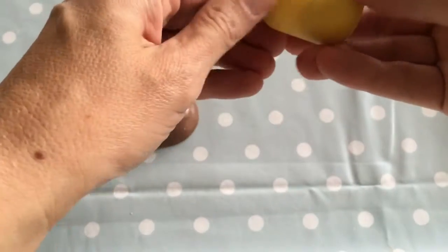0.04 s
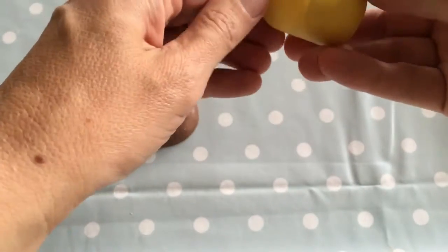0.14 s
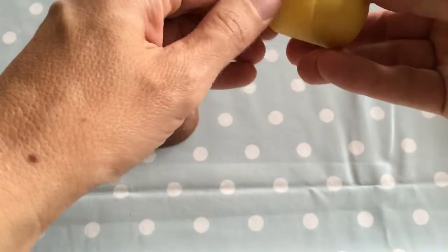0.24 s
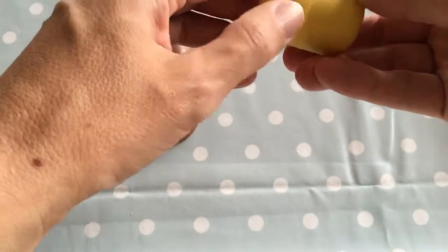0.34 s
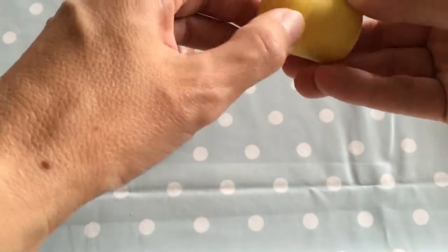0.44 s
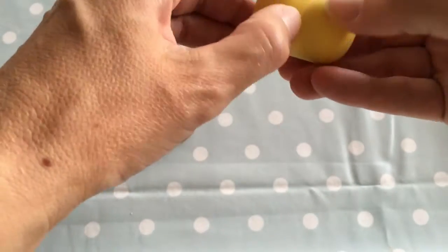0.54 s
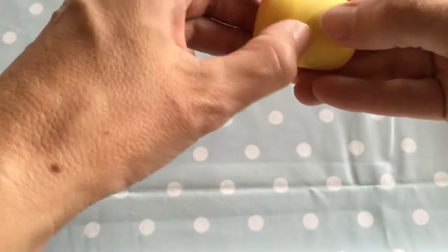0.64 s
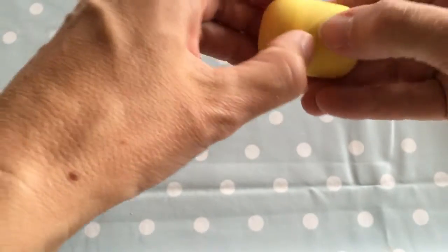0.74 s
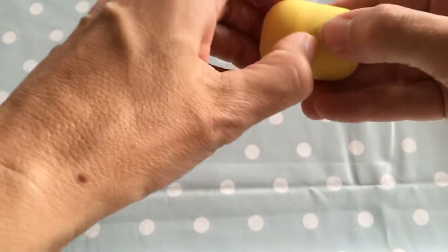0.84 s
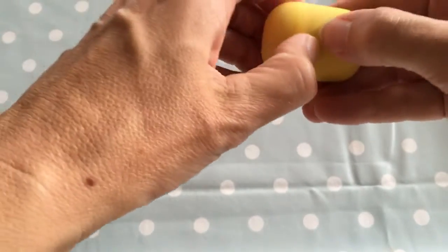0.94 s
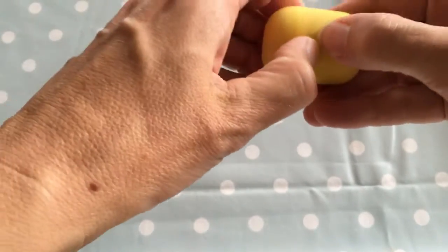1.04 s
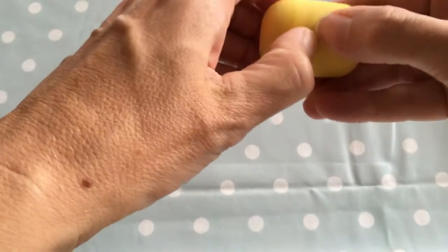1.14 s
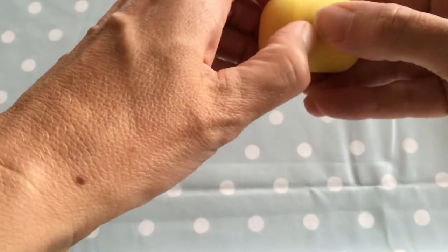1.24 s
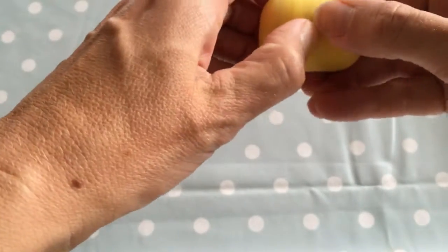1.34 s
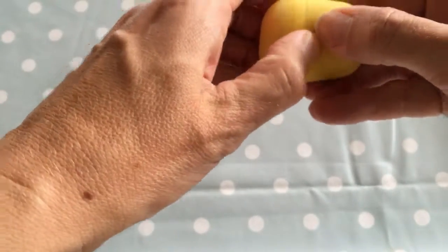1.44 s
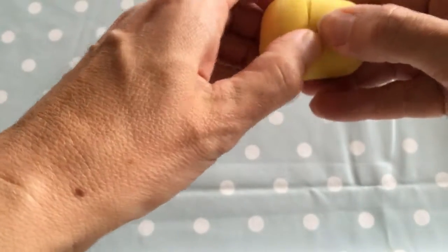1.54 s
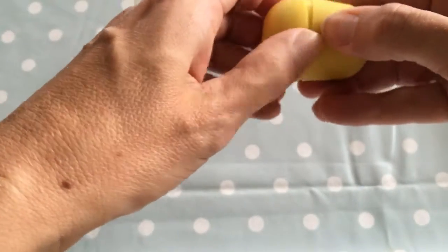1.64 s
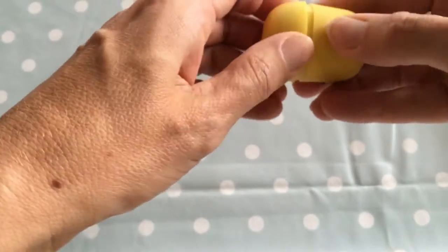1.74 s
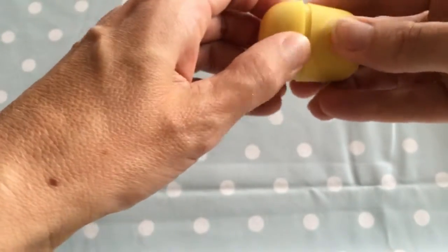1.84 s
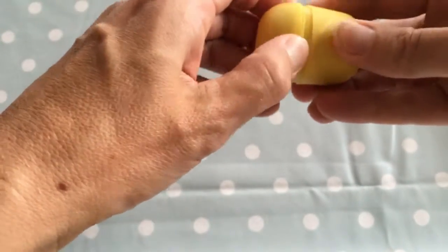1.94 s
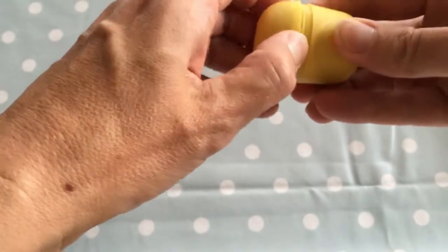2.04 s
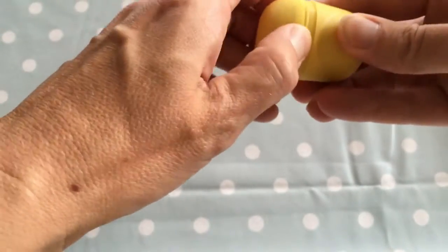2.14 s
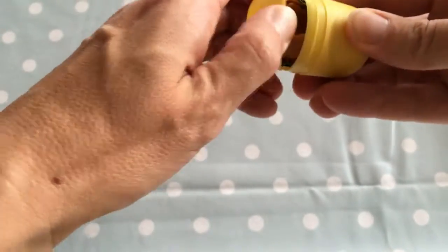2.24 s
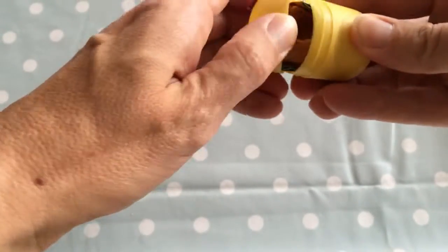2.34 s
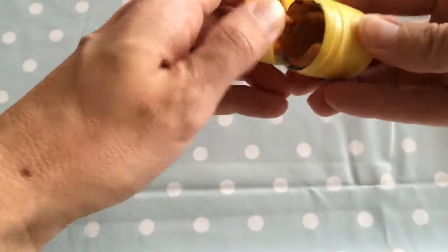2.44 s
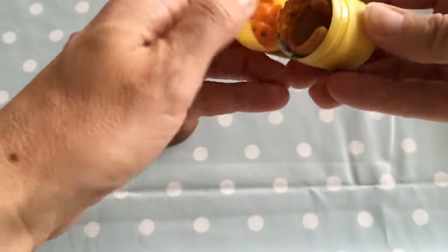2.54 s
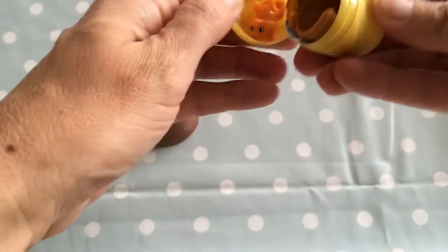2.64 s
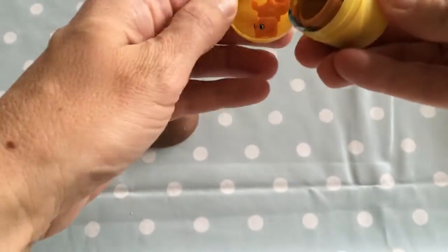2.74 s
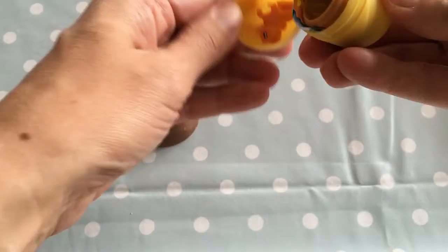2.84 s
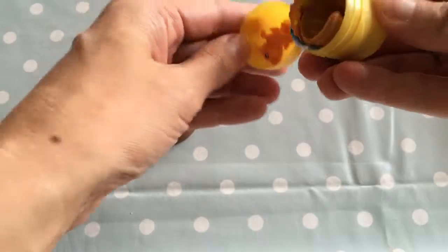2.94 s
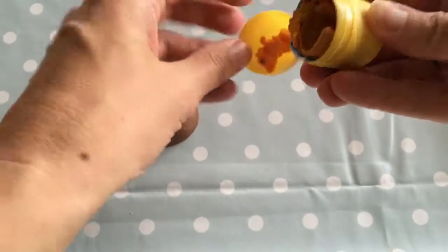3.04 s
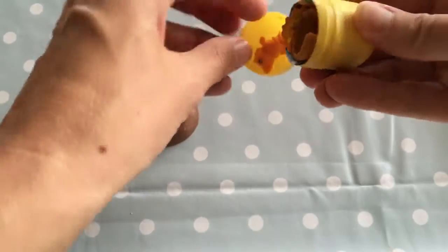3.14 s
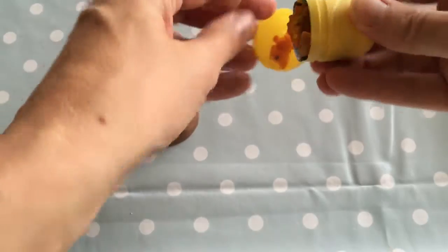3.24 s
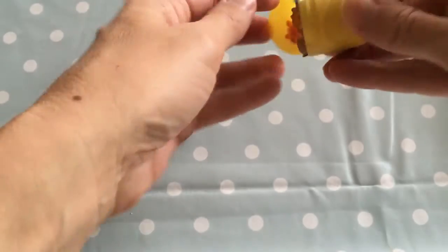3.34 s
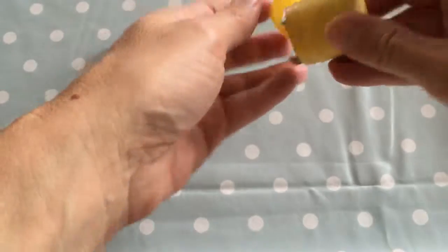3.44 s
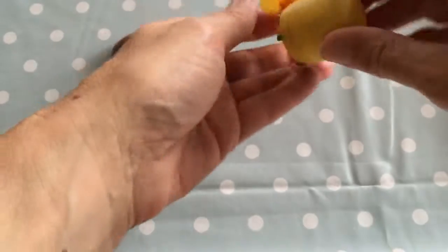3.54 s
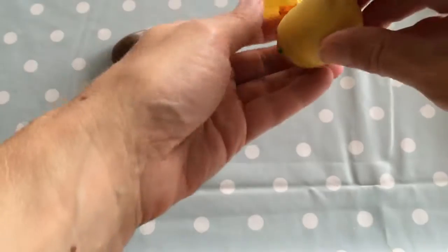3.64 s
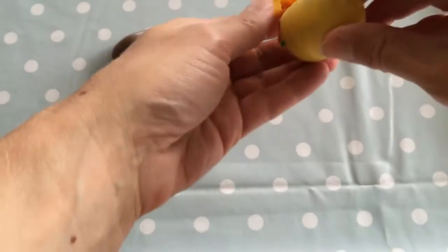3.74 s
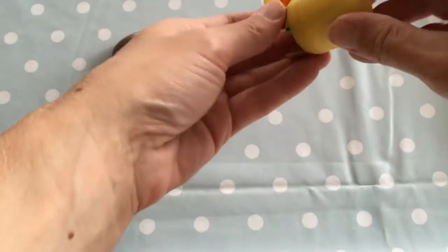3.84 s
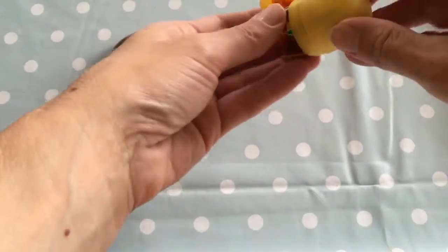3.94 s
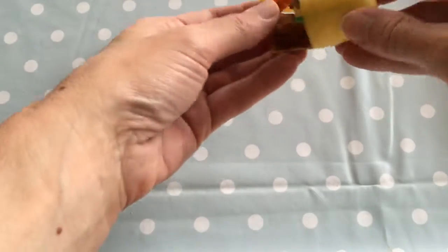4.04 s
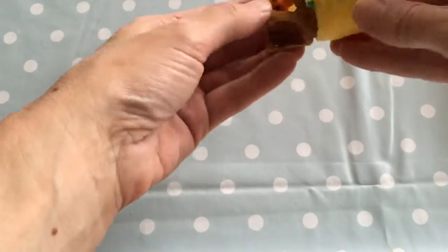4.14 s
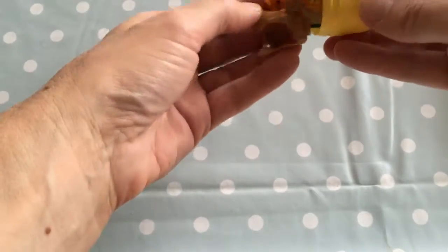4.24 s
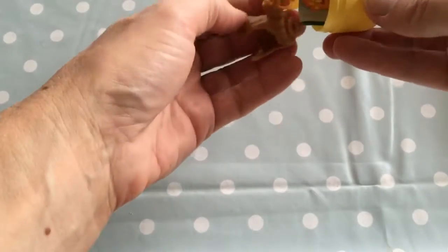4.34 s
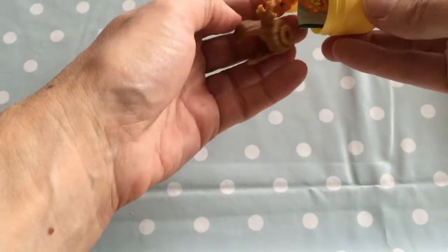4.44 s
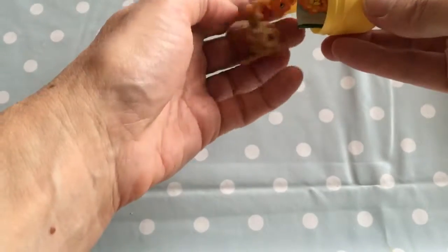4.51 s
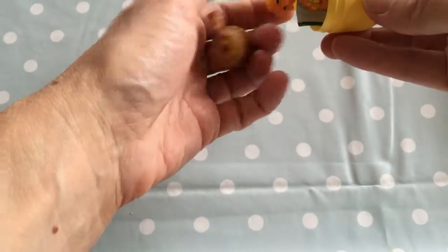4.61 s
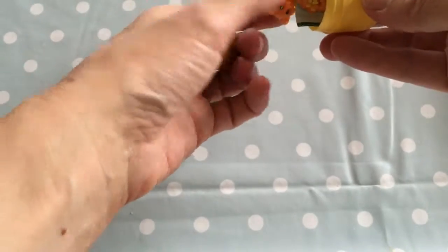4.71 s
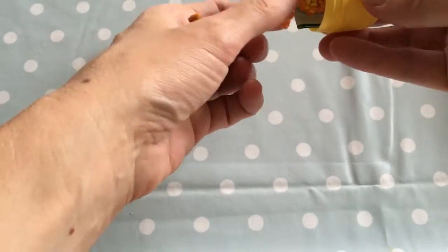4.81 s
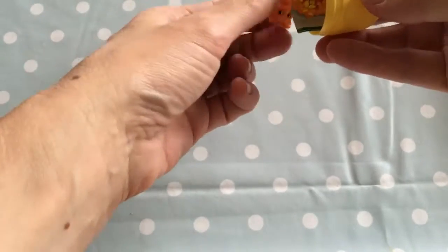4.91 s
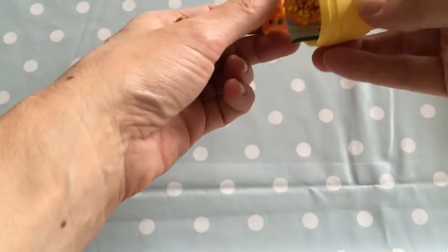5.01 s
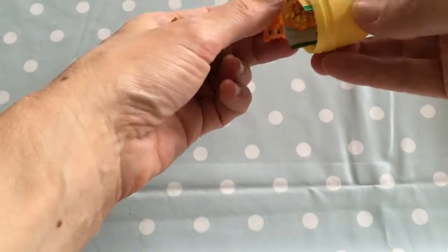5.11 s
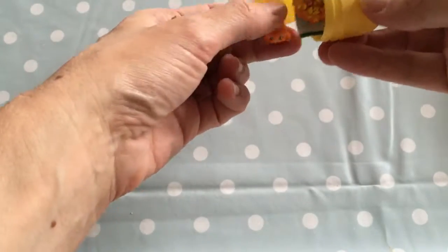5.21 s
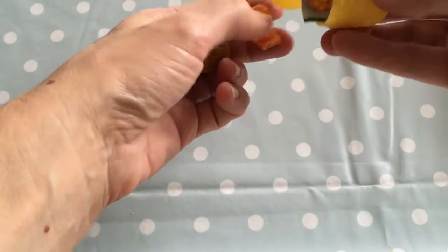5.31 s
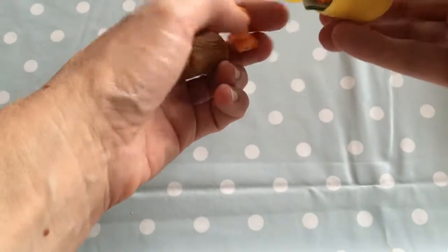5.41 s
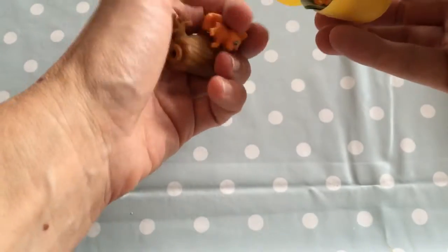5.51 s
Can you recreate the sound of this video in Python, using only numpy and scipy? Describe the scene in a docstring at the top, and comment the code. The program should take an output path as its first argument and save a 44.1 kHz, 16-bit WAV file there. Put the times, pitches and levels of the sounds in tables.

```python
"""Quiet humming room: hands squeeze a small plastic capsule until its seam snaps, pull it open, tip small parts in it.
Snaps and ticks are short forces ringing resonances of wall, cup air, shell and edge.
Slides are grainy friction noise on the same resonances; a noise tail adds the room.
The hum is coloured noise; the recorder's hiss comes up for a moment after each loud snap."""
import sys
import numpy as np
from scipy import signal
from scipy.fft import rfft, irfft
from scipy.io import wavfile
from scipy.ndimage import uniform_filter1d

SR = 44100
rng = np.random.default_rng(int(sys.argv[2]) if len(sys.argv) > 2 else 0)


def store_pcm(level_fs):
    """Save levels as 16-bit WAV."""
    pcm = np.round(np.clip(level_fs, -1, 1) * 32767).astype(np.int16)
    wavfile.write(sys.argv[1], SR, np.atleast_2d(pcm).T)


N = 245637

# Room hum, relative spectrum: (frequency [Hz], level [dB per Hz])
HUM_SPECTRUM = [(25, -24), (38, -9), (51, 6.5), (66, -10.5), (88, 0), (115, -10.5), (180, -9), (260, -14),
                (400, -24.5), (700, -26), (1500, -31.5), (2500, -62)]
HUM_RMS_DB = -63

# Recorder hiss, relative spectrum: (frequency [Hz], level [dB per Hz])
HISS_SPECTRUM = [(180, -29), (300, -0.5), (511, -11), (667, -12), (946, -9), (1010, -14.5), (2280, -11.5),
                 (9550, -17.5), (16000, -23)]
HISS_RMS_DB, HISS_HELD_DOWN_DB = -62.5, -11.5
RELEASE_PEAK_DB, RELEASE_HOLD_S = -15.5, 0.413

# Room tail bands: (centre [Hz], t60 [s], relative level [dB])
ROOM_BANDS = [(147, 1, -32.5), (324, .45, -24.5), (930, 0.81, -37.5), (1560, 0.38, -31.5),
              (2500, 0.42, -28), (4500, 0.27, -31.5), (6960, 0.14, -26), (12100, 0.12, -32)]
ECHO_DELAY_S, ECHO_RISE_S, TAIL_GAIN_DB = 0.0019, 0.0085, -17.5

# Dips of the microphone port: (centre [Hz], width [Hz], share removed [0-1])
PORT_DIPS = [(5000, 800, .3), (10500, 900, .45)]
CUTOFF_HZ = 16300

# Cup air pitch as the opening changes: rises, sinks a little, rises again: (time [s], pitch [Hz])
CUP_PITCH = [(2.3, 1400), (2.45, 1470), (2.55, 1720), (2.68, 1900), (3.6, 1830), (4.2, 1750), (5.3, 1950)]
OPEN_S = CUP_PITCH[0][0]

# Bending of the wall, first mode only while squeezed shut: (frequency [Hz], width [Hz], relative level [dB])
WALL_MODES = [(200, 130, -9.5), (370, 400, -8), (960, 1100, -5)]
# Shell modes: (frequency [Hz], width [Hz], relative level [dB])
SHELL_MODES = [(2600, 440, 2.5), (3190, 1700, -1), (3440, 560, 4), (4244, 810, -3.5), (5067, 820, -8.5)]
# Edge modes: (frequency [Hz], width [Hz], relative level [dB])
EDGE_MODES = [(6060, 2000, -5.5), (7420, 1200, -1.5), (8234, 1200, -2), (9565, 1800, -1),
              (11460, 2900, -0.2), (13600, 2600, -8.5)]

# Fingers and parts sliding, plastic level before its brightness split:
# (start [s], length [s], cup air level [dB], plastic level [dB], brightness [octaves above 1 kHz])
SLIDE_EVENTS = [(0.046, 0.1, -94.5, -62, 2.73), (0.194, 0.46, -96, -73.5, 2.53),
                (0.325, 0.078, -86, -66, 3.1), (0.385, 0.065, -88, -76, 2.7), (0.54, 0.051, -88, -59, 3),
                (0.661, 0.057, -86, -65.5, 2.3), (2.283, 0.012, -63, -41, 0.28),
                (2.299, 0.0075, -39, -38.5, 1.48), (2.302, 0.033, -46.5, -69, 0.97),
                (2.391, 0.059, -50, -73, 1.5), (2.461, 0.037, -54, -53, 2), (2.527, 0.057, -64, -65, 2.9),
                (2.577, 0.024, -52.5, -53, 2.3), (2.596, 0.098, -66.5, -67, 1.3),
                (2.686, 0.055, -66, -63.5, 1.96), (2.747, 0.14, -82, -72, 1.56),
                (2.902, 0.066, -80, -64, 1.43), (3.011, 0.051, -72, -65.5, 2.17),
                (3.065, 0.051, -73.5, -66, 3.4), (3.167, 0.12, -68.5, -72.5, 2.06),
                (3.338, 0.043, -67.5, -65, 2.1), (3.414, 0.07, -62.5, -60.5, 0.7),
                (3.461, 0.045, -66, -63, 2.4), (3.512, 0.067, -57, -61, 1.9),
                (3.558, 0.081, -60.5, -63, 2.5), (3.648, 0.074, -63.5, -64.5, 2.1),
                (3.74, 0.12, -65, -67.5, 1.25), (3.889, 0.064, -63, -72, 2.6), (4.01, 0.1, -66.5, -77, 2.9),
                (4.093, 0.069, -66.5, -70, 2.2), (4.423, 0.042, -73, -89, 2.2),
                (4.596, 0.035, -70, -73, 1.8), (4.667, 0.077, -73.5, -72, 1.3), (4.956, 0.076, -64, -70, 2),
                (5.06, 0.07, -86, -80, 2.5), (5.184, 0.073, -65.5, -65, 3.24),
                (5.235, 0.019, -59.5, -54, 3), (5.26, 0.12, -69.5, -70, 2.15),
                (5.515, 0.037, -77.5, -68.5, 1.8), (5.557, 0.011, -54, -48, 1.85)]
# Best answer of wall, shell, lower edge, upper edge to a slide: (brightness [octaves above 1 kHz], gain there [dB])
SLIDE_RESPONSE = [(-.3, 6.5), (1.9, -0.5), (2.8, 0), (3.7, 5)]
SLIDE_DB_PER_OCTAVE = 6
GRAIN_RMS_DB, CRACKLES_PER_S, CRACKLE_FLOOR_DB = 3, 400, 5.5
GRIP_ATTACK_S, GRIP_SAG_DB = 0.002, -4

# Small parts and fingers ticking on the plastic, plastic level before its brightness split:
# (time [s], air pitch [Hz], air level [dB], plastic level [dB], brightness [octaves above 1 kHz])
TICK_EVENTS = [(0.2646, 2320, -49, -48, 2.1), (0.2795, 1170, -51.5, -53.5, 1.73),
               (1.2005, 1186, -73, -46.5, 3.2), (1.6976, 1870, -41, -39, 2.57),
               (1.7674, 1800, -48.5, -39.5, 2.38), (2.3041, 1480, -20.5, -32, 3.2),
               (2.331, 1470, -24.5, -32.5, 2.26), (2.371, 1490, -33, -51, 2.7),
               (2.4738, 1240, -43, -24.5, 3.2), (2.49, 1650, -22.5, -29, 2.6),
               (2.5643, 1730, -62, -39, 2.3), (2.5785, 1700, -28.5, -20, 2.63),
               (2.5983, 1800, -32.5, -29.5, 1.8), (2.6102, 1730, -44, -62, 2.1),
               (2.6483, 2260, -40, -31, 1.7), (2.6971, 2030, -44.5, -39.5, 1.96),
               (2.753, 1270, -56, -59, 2.1), (2.9468, 1150, -56.5, -50, 1.6), (3.0486, 1210, -50, -50, 3.2),
               (3.21, 1233, -52, -47.5, 2.5), (3.2499, 1800, -45.5, -46, 1.64),
               (3.2597, 1300, -47, -49, 1.54), (3.3636, 1300, -46.5, -51, 2.1),
               (3.3882, 1510, -52, -54, 2.4), (3.406, 1600, -48.5, -62, 3),
               (3.423, 1850, -37.5, -46.5, 1.94), (3.443, 1430, -48.5, -52, 1.8),
               (3.457, 1890, -40.5, -50, 1.8), (3.466, 1630, -46, -47.5, 1.85), (3.5163, 1860, -44, -50, 2),
               (3.5342, 1900, -43.5, -46, 2.6), (3.5454, 1830, -50, -38.5, 2.3),
               (3.5582, 1660, -32, -23, 1.25), (3.582, 1630, -54, -34.5, 2.3),
               (3.5992, 1540, -39.5, -31, 2.53), (3.6757, 2230, -43, -34, 2.46),
               (3.6881, 1580, -39, -37.5, 2.26), (3.6931, 1630, -44.5, -40.5, 1.55),
               (3.7236, 1660, -48.5, -40.5, 2.2), (3.9114, 1690, -52, -49, 2.3),
               (3.9218, 1670, -48, -62, 2.6), (4.0609, 1810, -46.5, -46, 2.6),
               (4.124, 1830, -41.5, -45.5, 2.5), (4.1294, 1730, -41.5, -45.5, 1.7),
               (4.185, 1730, -46.5, -52, 2.6), (4.2568, 1850, -50.5, -55, 2.5),
               (4.453, 2035, -51.5, -52, 2.4), (4.6224, 2060, -48, -55, 1.76),
               (4.6336, 1910, -46, -43.5, 1.5), (4.703, 2053, -46.5, -42.5, 2.67),
               (4.716, 1900, -40.5, -46, 2.4), (4.7205, 1880, -41.5, -56, 3.1),
               (4.7316, 1910, -45, -46.5, 2.2), (4.7465, 1780, -50, -62, 1.9),
               (4.988, 1740, -42.5, -64, 2.5), (4.9912, 1590, -37.5, -48, 1.4),
               (5.0258, 1850, -49.5, -62, 2), (5.284, 1940, -40.5, -38, 2.5), (5.3167, 1880, -42, -44, 2.3),
               (5.339, 1994, -33.5, -30, 2.44), (5.5214, 1697, -45, -25.5, 2.14),
               (5.556, 1200, -55, -47, 2.4), (5.5618, 1100, -46, -21, 1.95)]
# Best answer of shell, edge to a tick: (brightness [octaves above 1 kHz], gain there [dB])
TICK_RESPONSE = [(1.7, 2), (3.2, 3.3)]
TICK_DB_PER_OCTAVE = 11.5
WALL_UNDER_AIR_DB, KNOCK_DB_PER_OCTAVE = -13.5, 20

# Seam snaps of the shut capsule: (time [s], wall thump [dB], air pitch [Hz], air level [dB],
# shell ring [dB], edge crack [dB], brightness [octaves above 1 kHz])
SNAP_EVENTS = [(0.8895, -65, 1680, -36, -28, -12, 1.85), (1.5106, -17.5, 1708, -7, -16.5, -9, 1.5),
               (1.517, -22.5, 1796, -19.5, -27, -18, 2.35), (1.529, -18, 1410, -7.5, -9, -6, 1.35),
               (1.5385, -48.5, 2400, -24, -38.5, -32.5, 1.3), (1.5729, -46, 1786, -41, -39, -26, 1.55),
               (1.9541, -6, 1403, -8, -8, -7, 1.35)]
SHELL_FAVOUR_DB_PER_OCTAVE, EDGE_FAVOUR_DB_PER_OCTAVE = 15.5, 3.5
STRIKE_SPREAD_DB, SHUT_AIR_WIDTH_HZ = 2, 1400


def from_db(db):
    """Decibels to amplitude."""
    return 10 ** (np.asarray(db) / 20)


def rms_one(x):
    """Scale to rms 1."""
    return x / np.sqrt(np.mean(x ** 2) + 1e-20)


def peak_one(x):
    """Scale to peak 1."""
    return x / np.max(np.abs(x))


def resonance(x, hz, width_hz):
    """Two-pole resonance, gain 1 on top."""
    r = np.exp(-np.pi * width_hz / SR)
    poles = [1, -2 * r * np.cos(2 * np.pi * hz / SR), r * r]
    return signal.lfilter([(1 - r * r) / 2, 0, (r * r - 1) / 2], poles, x)


def body(x, modes, spread_db):
    """Modes in parallel with alternating sign, each struck with a strength of its own."""
    chance = rng.normal(0, 1, len(modes))
    out = 0
    for k, (hz, width_hz, db) in enumerate(modes):
        gain = from_db(db + spread_db * chance[k]) * (-1) ** k
        out = out + gain * resonance(x, hz, width_hz)
    return out


def cup_width_hz(hz):
    """The higher the air pitch, the wider its resonance: the sound gets out faster."""
    return 160 * (hz / 1430) ** 2


def part_levels_db(level_db, octave, response, db_per_octave):
    """Each part answers best at its own brightness, and less away from it."""
    best_octave, gain_db = np.transpose(response)
    return level_db + gain_db - db_per_octave * np.abs(octave - best_octave)


def favoured(modes, octave, db_per_octave):
    """A contact favours the modes near its own brightness."""
    return [(hz, width_hz, db - db_per_octave * abs(np.log2(hz / 1000) - octave)) for hz, width_hz, db in modes]


def coloured_noise(spectrum):
    """Noise shaped to a level per Hz, interpolated over log frequency; rms 1."""
    hz, db = np.transpose(spectrum)
    grid_hz = np.maximum(np.arange(N // 2 + 1) * SR / N, 1)
    shape_db = np.interp(np.log(grid_hz), np.log(hz), db, -90, -90)
    return rms_one(irfft(rfft(rng.standard_normal(N)) * from_db(shape_db), N))


def room_hum():
    """Steady low-weighted noise of the quiet room."""
    return from_db(HUM_RMS_DB) * coloured_noise(HUM_SPECTRUM)


def recorder_hiss(x):
    """A suppressor holds the hiss down and lets go for a fixed time after each loud treble peak."""
    treble = signal.sosfilt(signal.butter(4, 5000, "high", fs=SR, output="sos"), x)
    loud = np.abs(treble) > from_db(RELEASE_PEAK_DB)
    last_loud = np.maximum.accumulate(np.where(loud, np.arange(N), -N))
    quiet = np.arange(N) - last_loud > RELEASE_HOLD_S * SR
    held = uniform_filter1d(quiet * 1., size=200)
    return from_db(HISS_RMS_DB + HISS_HELD_DOWN_DB * held) * coloured_noise(HISS_SPECTRUM)


def room_tail(x):
    """Noise tail that dies band by band and starts with the first wall echo."""
    t = np.arange(SR // 2) / SR
    rise = np.clip((t - ECHO_DELAY_S) / ECHO_RISE_S, 0, 1)
    tail = 0
    for hz, t60_s, db in ROOM_BANDS:
        octave_band = signal.butter(2, [hz / 1.415, hz * 1.416], "band", fs=SR, output="sos")
        band = signal.sosfilt(octave_band, rng.standard_normal(len(t)))
        tail = tail + from_db(db + TAIL_GAIN_DB - 60 * t / t60_s) * band * rise
    return signal.fftconvolve(x, tail)[:N]


def friction_force():
    """Noise of wandering grain plus crackles: tiny slips within the friction."""
    wander = rms_one(signal.lfilter([1], [1, -1.9, .9025], rng.standard_normal(N)))
    crackle_db = CRACKLE_FLOOR_DB + 2.04 * np.minimum(rng.exponential(1, N), 4)
    crackles = (rng.random(N) < CRACKLES_PER_S / SR) * from_db(crackle_db)
    return rng.standard_normal(N) * from_db(GRAIN_RMS_DB * wander) + crackles


def cup_air(force):
    """Neighbouring air resonances cross-fade as the opening changes."""
    pitches_hz = np.geomspace(1400, 2000, 7)
    pitch_hz = np.interp(np.arange(N) / SR, *np.transpose(CUP_PITCH))
    place = np.interp(np.log(pitch_hz), np.log(pitches_hz), np.arange(7))
    out = 0
    for k, hz in enumerate(pitches_hz):
        weight = np.clip(1 - np.abs(place - k), 0, 1)
        out = out + weight * resonance(force, hz, cup_width_hz(hz))
    return out


def slides():
    """Friction plays on air, wall, shell and edge; slides swell and fade, grip slips start at once and sag."""
    t = np.arange(N) / SR
    power = np.zeros((5, N))
    for start, length, air_db, plastic_db, octave in SLIDE_EVENTS:
        fade = 0.00051 + .2 * length
        a, b = int(max(start - fade, 0) * SR), int((start + length + fade) * SR)
        age = t[a:b] - start
        if start < OPEN_S - .1:   # finger slipping on the shut shell
            attack = np.clip(age / GRIP_ATTACK_S, 0, 1)
            release = np.clip((b / SR - t[a:b]) / (2 * fade), 0, 1)
            swell = attack * from_db(GRIP_SAG_DB * age / length) * release
        else:
            swell = np.clip(np.minimum(age, start + length - t[a:b]) / (2 * fade) + .5, 0, 1)
        plastic = part_levels_db(plastic_db, octave, SLIDE_RESPONSE, SLIDE_DB_PER_OCTAVE)
        power[:, a:b] += from_db([air_db, *plastic])[:, None] ** 2 * swell ** 2
    force = friction_force()
    parts = [cup_air(force)]
    for modes in (WALL_MODES[1:], SHELL_MODES[2:], EDGE_MODES[:4], EDGE_MODES[4:]):
        parts.append(body(force, modes, 0))
    return sum(np.sqrt(p) * rms_one(part) for p, part in zip(power, parts))


def contact(s, wall_db, air_hz, air_db, shell_db, edge_db, octave):
    """Sharp slip and rough scuff strike shell and edge; wall and air feel only the smooth force."""
    t = np.arange(2048) / SR
    scuff = peak_one(rng.standard_normal(2048) * t * np.exp(-t / .0004)) + 1e-18
    scuff[16] += 4   # the slip itself
    push = -t * np.exp(-t / 0.00023) + 1e-18
    is_open = s > OPEN_S
    width_hz = cup_width_hz(air_hz) if is_open else SHUT_AIR_WIDTH_HZ   # fingers damp the shut capsule
    wall = body(push, WALL_MODES[1:] if is_open else WALL_MODES, 0)
    air = resonance(resonance(push, air_hz, width_hz), air_hz, 1200)
    shell = body(scuff, favoured(SHELL_MODES, octave, SHELL_FAVOUR_DB_PER_OCTAVE), STRIKE_SPREAD_DB)
    edge = body(scuff, favoured(EDGE_MODES, octave, EDGE_FAVOUR_DB_PER_OCTAVE), STRIKE_SPREAD_DB)
    levels_db = (wall_db, air_db, shell_db, edge_db)
    return sum(from_db(db) * peak_one(part) for db, part in zip(levels_db, (wall, air, shell, edge)))


def place_contacts(contacts):
    """Add up contacts, each starting 24 samples before its listed time."""
    out = np.zeros(N + 2048)
    for event in contacts:
        at = round(event[0] * SR) - 24
        out[at:at + 2048] += contact(*event)
    return out[:N]


def ticks():
    """Light contacts; one pitched below the cup's air is a knock on the wall and thumps more."""
    contacts = []
    for s, air_hz, air_db, plastic_db, octave in TICK_EVENTS:
        octaves_below = max(np.log2(np.interp(s, *np.transpose(CUP_PITCH)) / air_hz), 0)
        wall_db = air_db + WALL_UNDER_AIR_DB + KNOCK_DB_PER_OCTAVE * octaves_below
        shell_db, edge_db = part_levels_db(plastic_db, octave, TICK_RESPONSE, TICK_DB_PER_OCTAVE)
        contacts.append((s, wall_db, air_hz, air_db, shell_db, edge_db, octave))
    return place_contacts(contacts)


def snaps():
    """The seam lets go: contacts with a level of their own for each part."""
    return place_contacts(SNAP_EVENTS)


def scene():
    """Hum, hands on the capsule and their room tail; one channel."""
    hands = slides() + ticks() + snaps()
    return (room_hum() + room_tail(hands) + hands)[None]


def record(dry):
    """Hiss joins, the port dips the spectrum, tanh rounds peaks, a steep low-pass cuts the top."""
    out = dry + recorder_hiss(dry[0])
    for hz, width_hz, removed in PORT_DIPS:
        out = out - removed * resonance(out, hz, width_hz)
    low_pass = signal.cheby2(18, 60, CUTOFF_HZ, fs=SR, output="sos")
    return signal.sosfilt(low_pass, np.tanh(out))


dry = scene()
out = record(dry)
store_pcm(out)
```